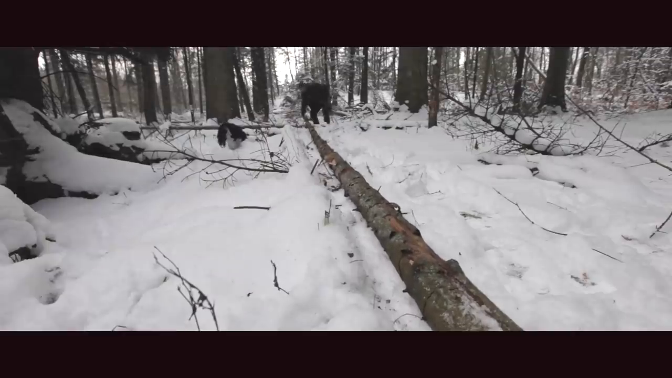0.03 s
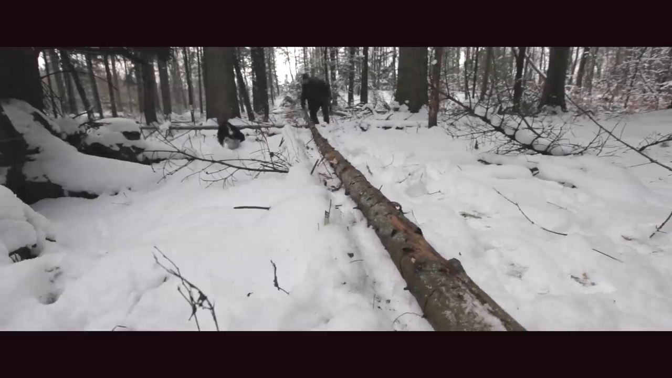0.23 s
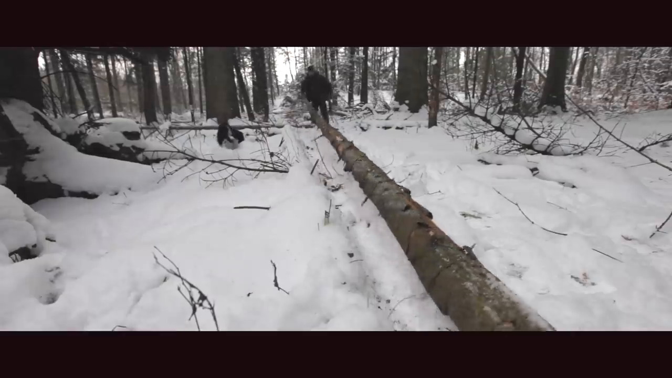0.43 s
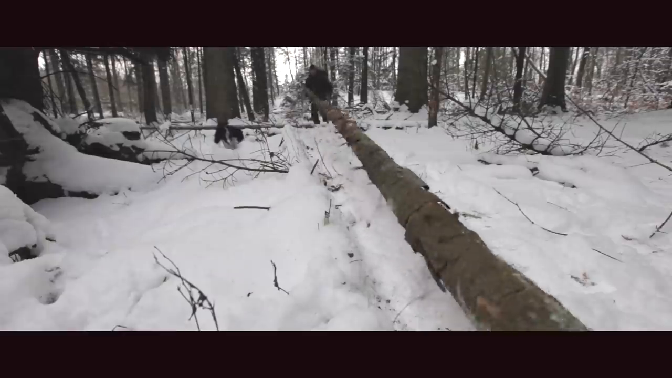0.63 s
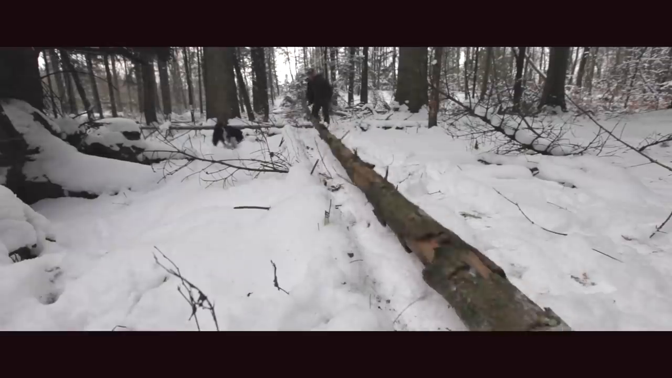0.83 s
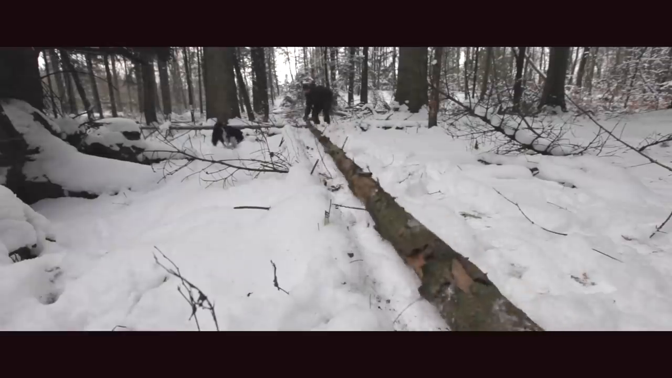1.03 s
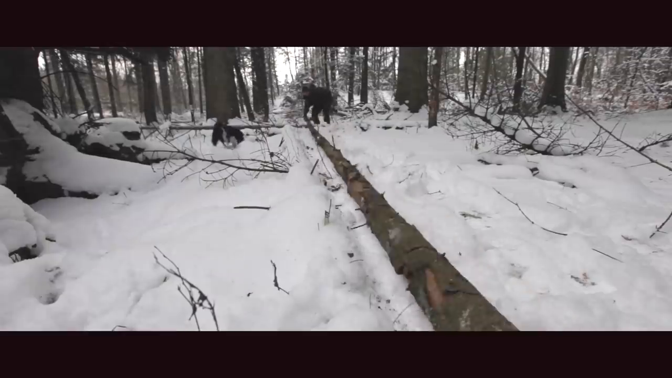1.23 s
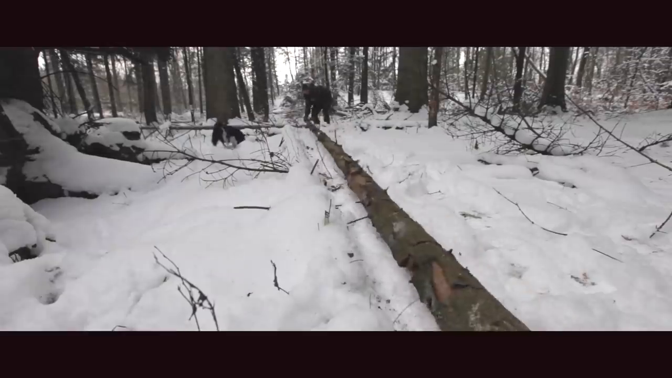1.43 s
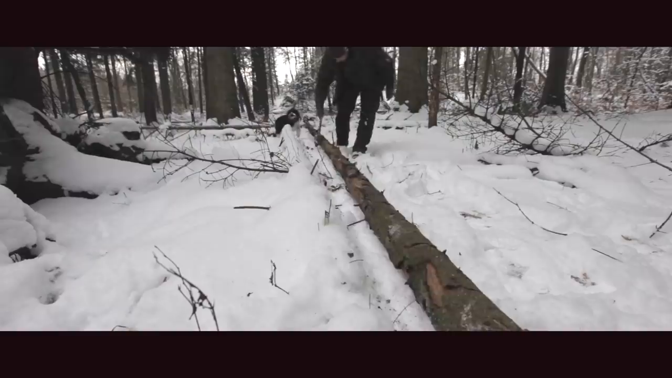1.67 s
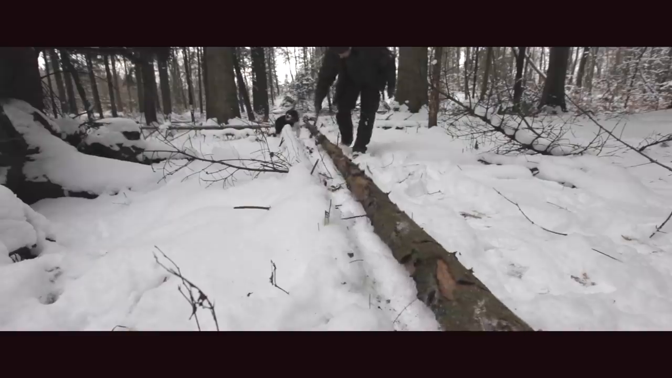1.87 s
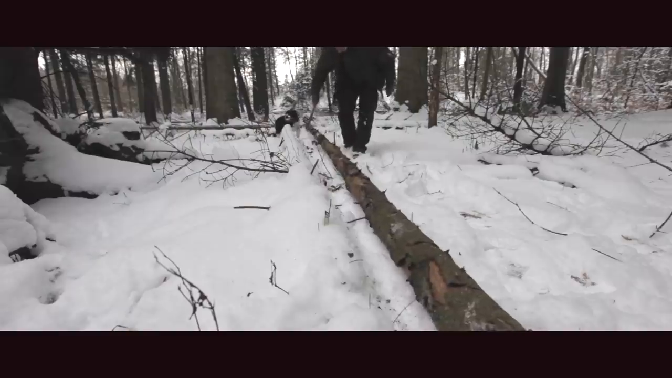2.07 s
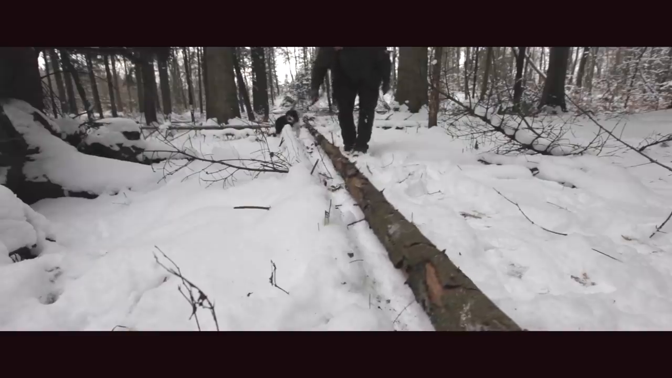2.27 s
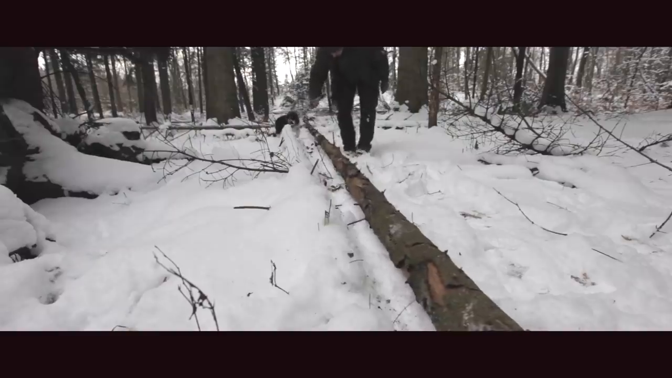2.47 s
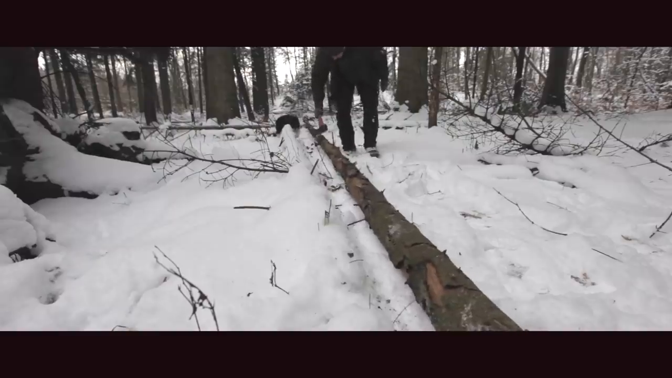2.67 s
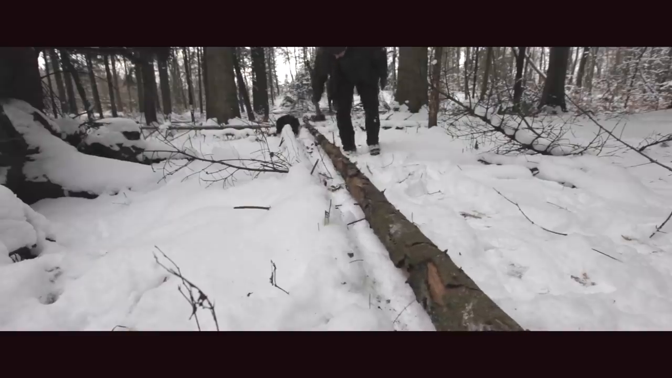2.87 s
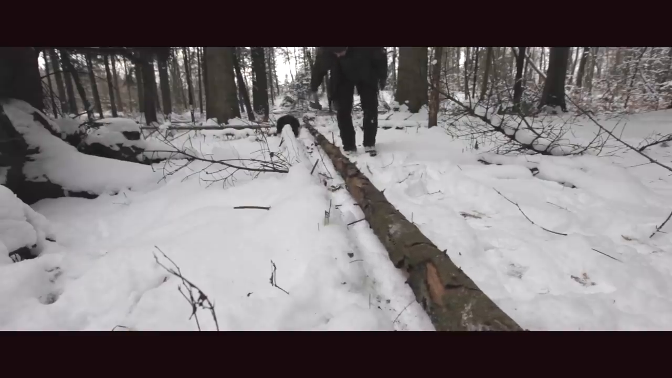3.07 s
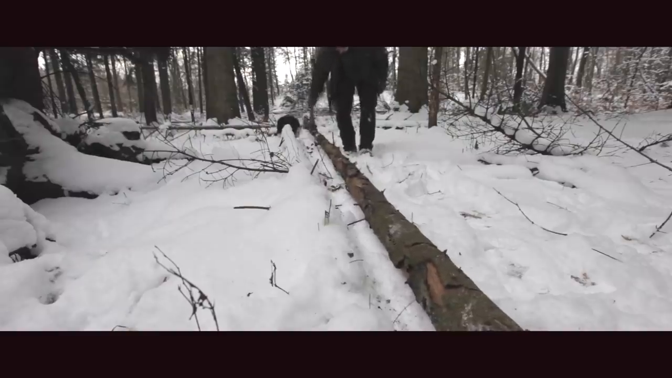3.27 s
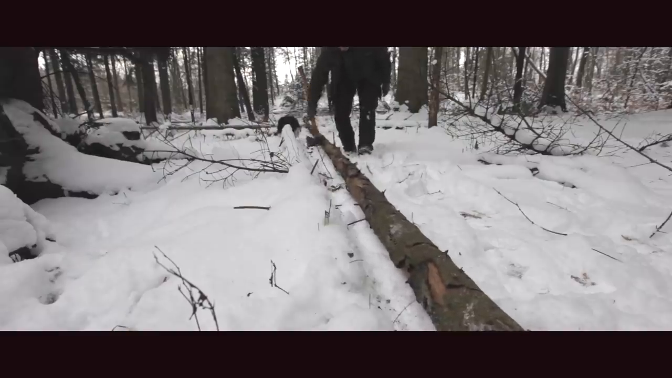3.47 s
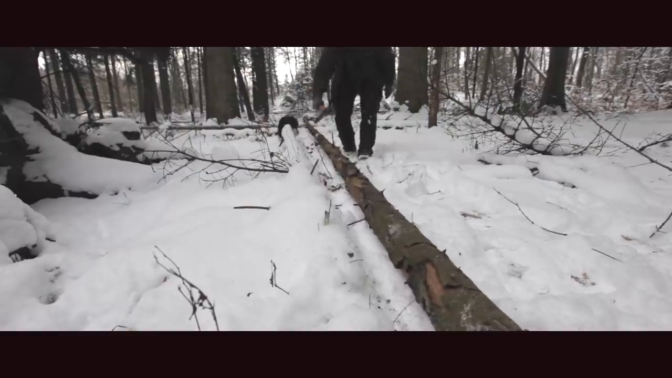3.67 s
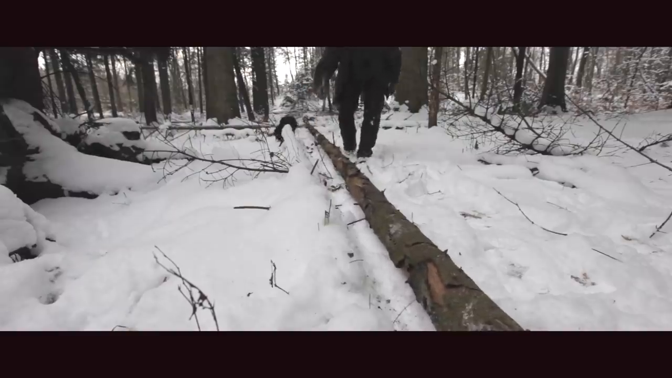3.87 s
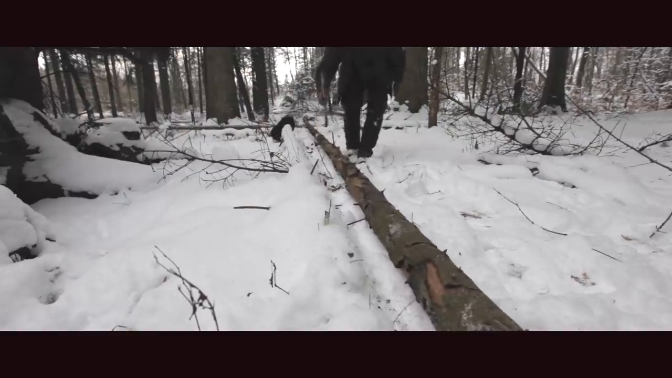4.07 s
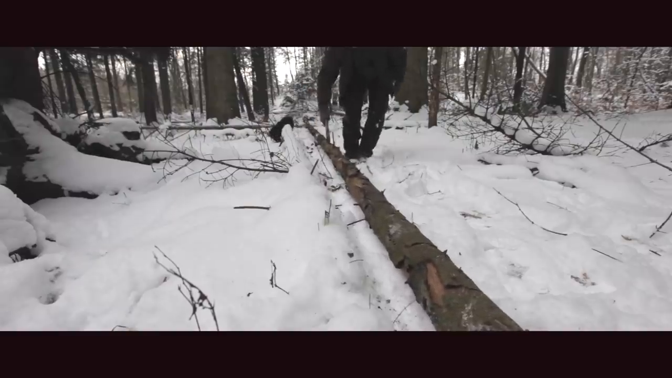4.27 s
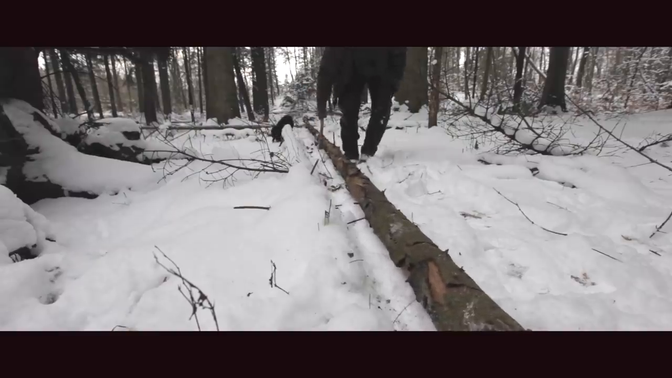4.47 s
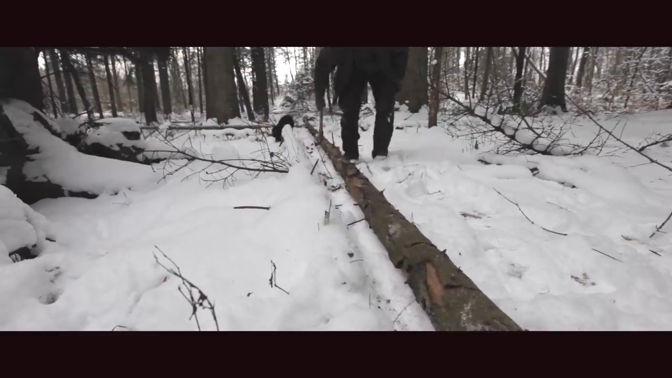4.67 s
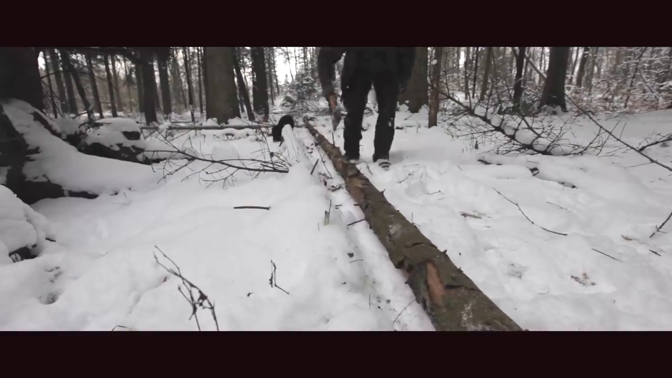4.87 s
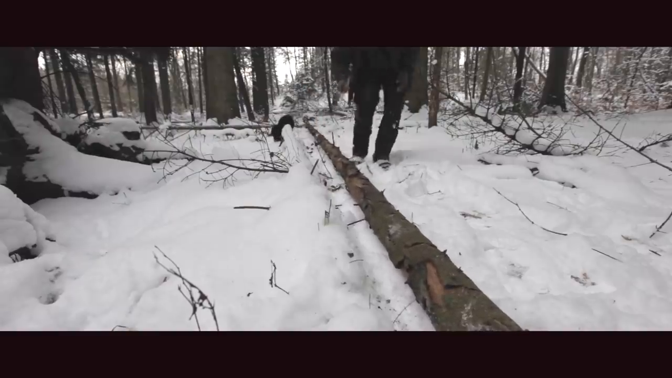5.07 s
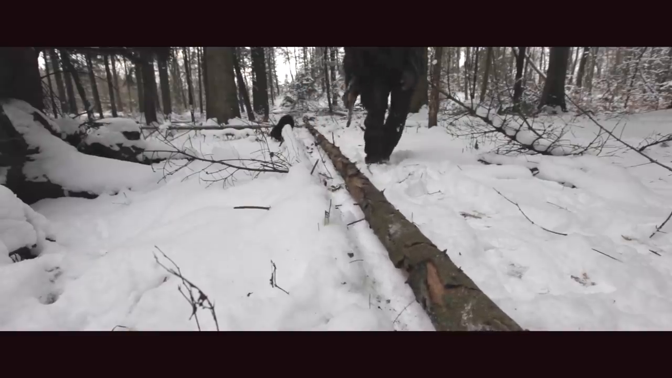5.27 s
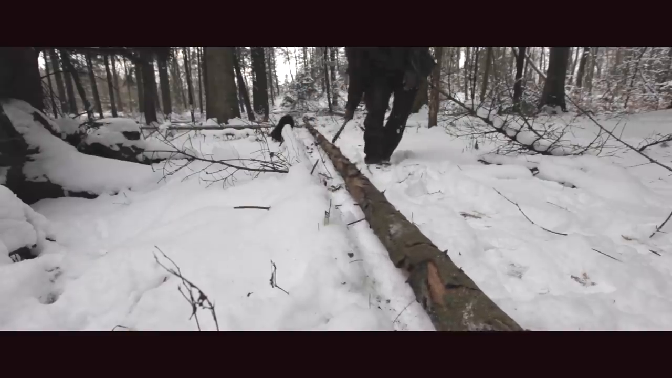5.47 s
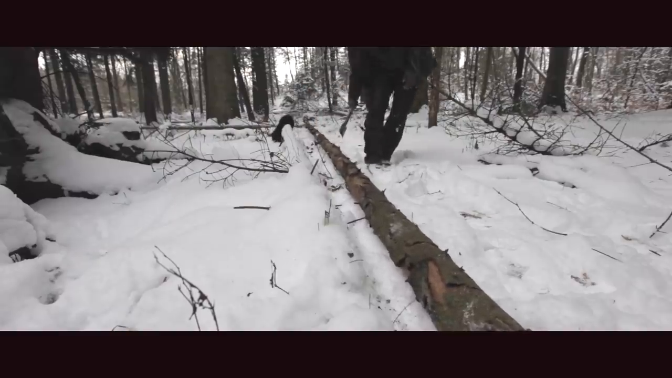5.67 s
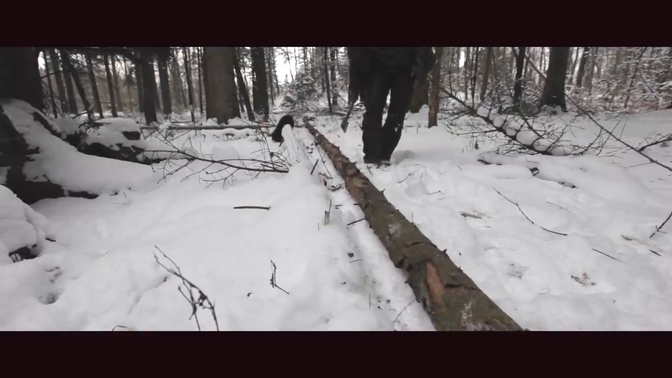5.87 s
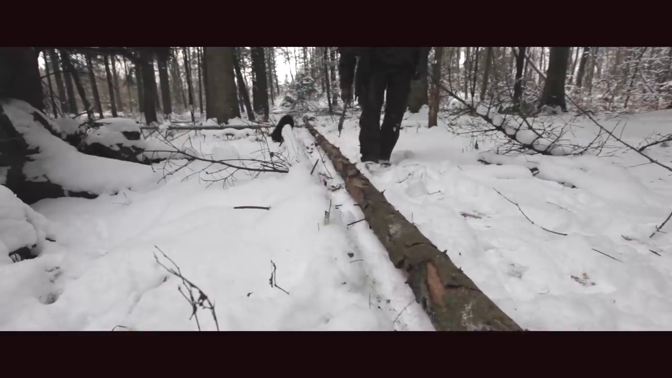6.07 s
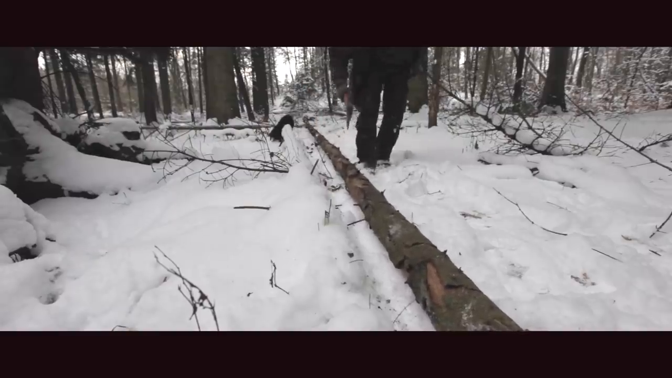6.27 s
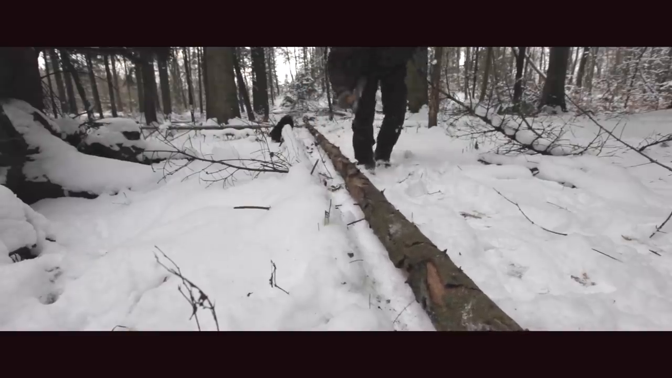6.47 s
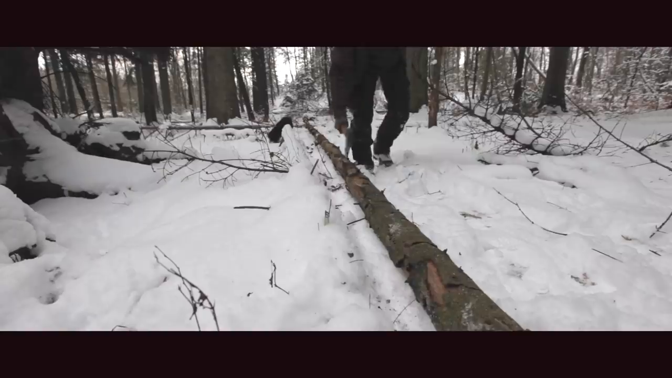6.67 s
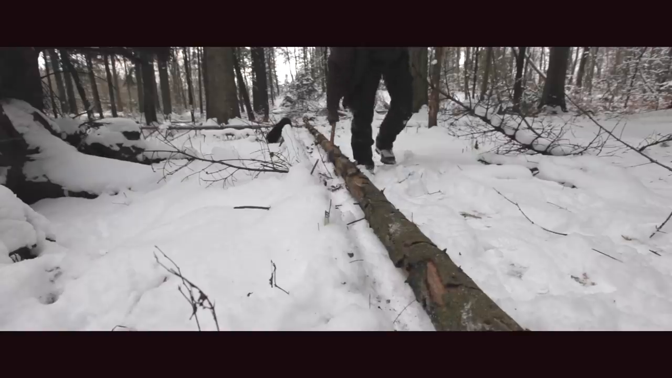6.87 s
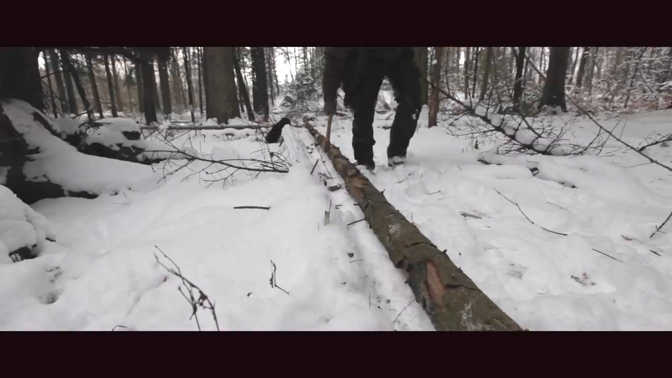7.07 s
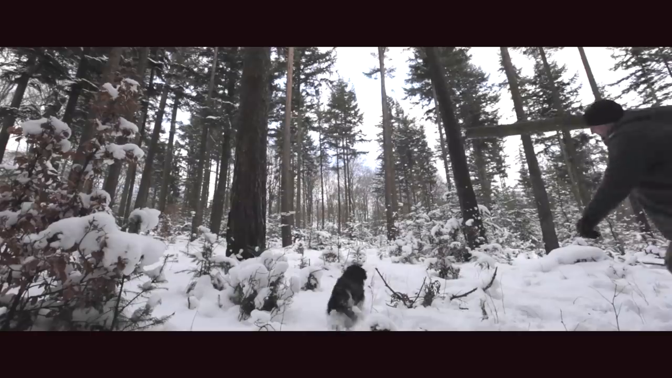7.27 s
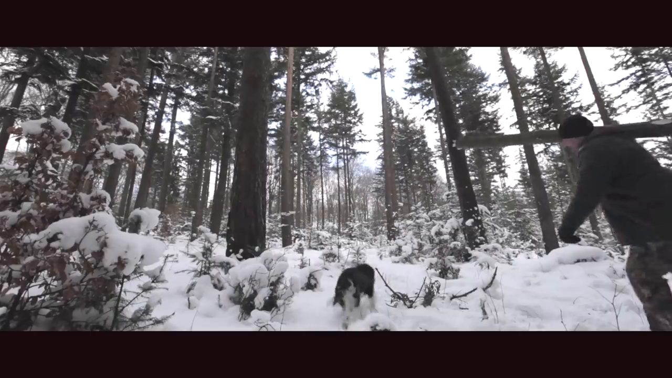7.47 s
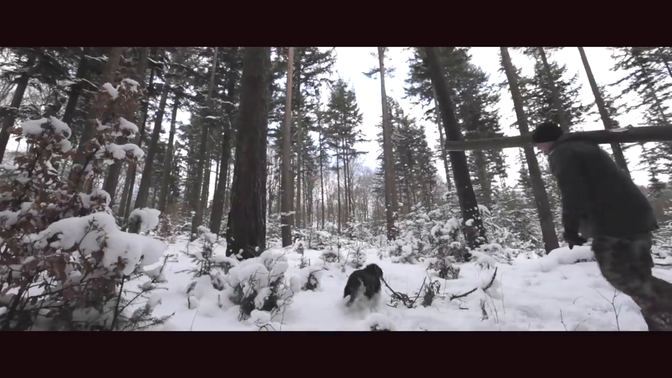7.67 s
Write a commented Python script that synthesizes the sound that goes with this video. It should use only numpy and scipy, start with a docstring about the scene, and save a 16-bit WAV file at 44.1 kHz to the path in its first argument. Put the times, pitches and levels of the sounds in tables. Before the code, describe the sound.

A quiet winter forest, heard close and almost dry, with soft air hush and a faint bright hiss. From 0 to 1.6 seconds a felled trunk is dragged in lurches: low rumble, crunching snow and bark, snapping twigs. Cracks gather near 0.85, then it lands at 1.0 with a huge, overloaded low wooden thud and bounces at 1.27. A glancing axe blow at 1.7 adds splintering and a tiny high steel ping. Further sharp chops fall at about 2.76, 3.45, 4.3 (a quick double), 5.47 and 6.73, each a short damped knock with brittle tearing fibres. The hush dips after each blow and swells back. Between them are cloth swishes, longest around 5.4, soft snow steps and small ticks of chips. At 7.2 the hush turns louder and steady, with a swish, then a thrown pole knocks twice quickly at 7.4.

```python
"""An axe lops dry branches off a felled trunk in a snowy forest, over a hush and a faint bright hiss.
First the trunk is dragged, rumbling and crunching amid snapping twigs, and dropped with one bounce.
Then each blow is a damped knock that rings the log's modes, with a quick volley of snapping fibres;
the hush, filtered noise, is turned down and swells back; noise swells make sleeves swish and snow crunch.
Near the end the hush turns louder and steady, and a thrown pole knocks. The loudest peaks overload."""
import sys
import numpy as np
from scipy import signal
from scipy.fft import rfft, irfft
from scipy.io import wavfile
from scipy.ndimage import uniform_filter1d

SR = 44100
rng = np.random.default_rng(int(sys.argv[2]) if len(sys.argv) > 2 else 0)


def log_audio(samples):
    """Write samples as a 16-bit WAV file to the path given in sys.argv[1]."""
    # one column per channel
    frames = np.atleast_2d(samples).T
    # limit to full scale, then quantise
    limited = np.clip(frames, -1, 1)
    pcm = np.round(limited * 32767).astype(np.int16)
    wavfile.write(sys.argv[1], SR, pcm)


N = 340011  # samples
T = np.arange(N) / SR  # seconds


def from_db(db):
    """Amplitude gain is ten to the power of a twentieth of the decibels."""
    return 10 ** (np.asarray(db) / 20)


def rms_one(x):
    """Normalise to a mean square of one, so that a later gain sets the RMS level."""
    return x / np.sqrt(np.mean(x ** 2) + 1e-20)


def add(track, s, sound):
    """Superposition: mix a sound into the track from time s in seconds."""
    at = max(round(s * SR), 0)
    track[at:at + len(sound)] += sound[:N - at]


def lowpass(x, hz):
    """Second-order Butterworth low-pass: flat below the cutoff, falling 12 dB per octave above."""
    return signal.sosfilt(signal.butter(2, hz, fs=SR, output="sos"), x)


def highpass(x, hz):
    """Second-order Butterworth high-pass: flat above the cutoff, falling 12 dB per octave below."""
    return signal.sosfilt(signal.butter(2, hz, "high", fs=SR, output="sos"), x)


def coloured(x, spectrum, size=4096):
    """Minimum-phase filtering with the given spectrum; unit energy keeps the power of white noise."""
    hz, db = np.transpose(spectrum)
    grid = np.maximum(np.arange(size // 2 + 1) * SR / size, 1)
    log_gain = np.log(from_db(np.interp(np.log(grid), np.log(hz), db)))
    # folding the cepstrum onto positive times makes the filter causal
    cepstrum = irfft(log_gain)
    cepstrum[1:size // 2] *= 2
    response = irfft(np.exp(rfft(cepstrum[:size // 2], size)))
    return signal.oaconvolve(x, response / np.linalg.norm(response))[:len(x)]


def ring(x, hz, t60):
    """A damped resonator: a unit click sets a sine ringing that falls 60 dB in t60."""
    radius = from_db(-60 / (t60 * SR))
    angle = 2 * np.pi * hz / SR
    feedback = [1, -2 * radius * np.cos(angle), radius * radius]
    return signal.lfilter([0, np.sin(angle)], feedback, x + 1e-18)


def fade(t, t60):
    """Exponential decay by sixty decibels in t60."""
    return np.exp(-np.log(1000) * t / t60)


def swells(rows):
    """Gaussian gain envelopes, each given by its time, peak in dB and half length to 1/e in seconds."""
    return sum(from_db(db) * np.exp(-np.minimum(((T - s) / length) ** 2, 60)) for s, db, length in rows)


def grains(size, spread_db):
    """Impulsive noise: dense clicks of random sign and very uneven strength, with unit power."""
    strength_db = spread_db * np.minimum(rng.exponential(1, size), 7)
    return rms_one(rng.choice([-1, 1], size) * from_db(strength_db))


def scattered(x, t60, cut_hz):
    """Diffuse scattering: a dull noise tail that builds up over a few milliseconds, then decays."""
    t = T[:SR]
    tail = rng.standard_normal(SR) * fade(t, t60) * (1 - np.exp(-t / 0.012))
    tail = lowpass(tail / np.linalg.norm(tail), cut_hz)
    return signal.oaconvolve(x, tail)[:N]


# Dips of the hush after heavy blows. Each row: start in seconds, depth in dB,
# time constant of recovery in seconds.
HUSH_DIPS = [(1.03, 11, 0.96), (1.73, 17.5, 1.7), (2.78, 21.5, 1.1), (3.47, 15.5, 1.76), (4.34, 20, 1.07),
             (5.487, 28.5, 0.78), (6.74, 18.5, 0.98)]
# Spectrum of the hush. Each row: frequency in Hz, relative density in dB per Hz.
HUSH_SPECTRUM = [(18, -37.5), (30, -13.5), (79, -6.5), (239, -9), (273, -5.5), (311, -4.5), (404, -5),
                 (486, -3.5), (702, -3), (962, -3), (1220, -3), (2680, -10), (6900, -19), (9220, -33),
                 (16000, -45)]
HUSH_DB, DIP_ONSET_S = -38, .045
LOUDER_FROM_S, LOUDER_HUSH_DB = 7.191, -34.5  # from here on the hush is louder and steady


def hush():
    """Gain-ducked noise: turned down after heavy blows, as by automatic gain, it swells back."""
    dip_db = np.zeros(N)
    for s, depth_db, recovery in HUSH_DIPS:
        after = T >= s
        dip_db[after] = depth_db * np.exp(-(T[after] - s) / recovery)
    dipping_db = HUSH_DB - uniform_filter1d(dip_db, int(DIP_ONSET_S * SR))
    level_db = np.where(T < LOUDER_FROM_S, dipping_db, LOUDER_HUSH_DB)
    return from_db(level_db) * coloured(rng.standard_normal(N), HUSH_SPECTRUM)


# Spectrum of the bright crack. Each row: frequency in Hz, relative density in dB per Hz.
CRACK_SPECTRUM = [(1180, -44.5), (2000, -31), (3140, -16.5), (3710, -9), (4490, -8), (4990, -6),
                  (5780, -2.5), (6640, 1.5), (8120, -8), (9660, -15), (10400, -18.5), (14900, -35),
                  (16000, -33.5)]
# Spectrum of the woody midrange. Each row: frequency in Hz, relative density in dB per Hz.
WOODY_SPECTRUM = [(60, -49.5), (200, -0.5), (400, 0), (850, -1.5), (1400, -6), (1950, -3.5), (2700, -7),
                  (4500, -10.5), (12000, -56)]


def breaking(crack, woody):
    """Source and filter: abrupt fractures are heard through a bright and a woody spectrum."""
    return coloured(crack, CRACK_SPECTRUM) + coloured(woody, WOODY_SPECTRUM)


# Lurches of the log over the snow. Each row: peak time in seconds, half length in seconds,
# rumble in dB before a 4.5 dB cut, crunch in dB before a 6 dB cut.
LOG_LURCHES = [(0.236, 0.044, -33.5, -39), (0.55, 0.04, -37, -45.5), (0.654, 0.055, -63, -40.5),
               (.838, 0.025, -25.5, -25), (0.921, 0.041, -46, -33), (1.044, 0.062, -24, -34),
               (1.247, 0.037, -49, -30), (1.311, 0.07, -31, -35.5), (1.47, 0.065, -39, -59)]
# Spectrum of the rumble. Each row: frequency in Hz, relative density in dB per Hz.
RUMBLE_SPECTRUM = [(25, -15.5), (70, 10.5), (110, 5), (170, 1), (350, -4), (800, -35), (1500, -24),
                   (5000, -37)]
# steady sliding between the lurches, before the same two cuts
SLIDE_END_S, SLIDE_RUMBLE_DB, SLIDE_CRUNCH_DB = 1.6, -48, -45.5


def dragging():
    """Sliding friction: the log rumbles in lurches and crushes snow and bark in clumps of crumbs."""
    sliding = T < SLIDE_END_S
    rumble_rows = [(s, db, length) for s, length, db, _ in LOG_LURCHES]
    crunch_rows = [(s, db, length) for s, length, _, db in LOG_LURCHES]
    rumble_gain = from_db(SLIDE_RUMBLE_DB) * sliding + swells(rumble_rows)
    crunch_gain = from_db(SLIDE_CRUNCH_DB) * sliding + swells(crunch_rows)
    rumble = from_db(-4.5) * rumble_gain * coloured(rng.standard_normal(N), RUMBLE_SPECTRUM)
    # about 1000 clumps a second, each a short decaying push
    clumps = np.abs(grains(N, spread_db=2.3)) * (rng.random(N) < 1000 / SR)
    pressure = signal.oaconvolve(clumps, fade(T[:SR // 20], .016))[:N]
    crumbs = rms_one(pressure * grains(N, spread_db=3.0))
    splinters = rms_one(pressure * grains(N, spread_db=4.0))
    crush = breaking(crumbs, from_db(1.5) * splinters)
    return rumble + from_db(-6) * crunch_gain * crush


# Swishes of cloth and snow. Each row: peak time in seconds, peak in dB before a 3 dB cut,
# half length in seconds.
RUB_SWISHES = [(1.8, -45, 0.059), (2.18, -56.5, 0.086), (2.45, -50, 0.079), (2.87, -54, 0.058),
               (3.55, -52.5, 0.067), (3.95, -61, 0.13), (4.175, -35.5, 0.045), (4.98, -44.5, 0.084),
               (5.19, -37.5, 0.026), (5.40, -37, 0.12), (6.42, -51.5, 0.29), (7.24, -28, 0.033)]
# Spectrum of the rubbing. Each row: frequency in Hz, relative density in dB per Hz.
RUB_SPECTRUM = [(1650, -31), (2800, -17), (4180, -11), (4770, -8.5), (6070, -4.5), (6820, -4),
                (7770, -13.5), (10000, -21), (11800, -30), (14300, -25.5), (16000, -45.5)]
STEADY_HISS_DB = -62  # a faint, steady, bright hiss under the swishes; before the same 3 dB cut
SLEEVE_PEAK_S, SLEEVE_DB, SLEEVE_RISE_S, SLEEVE_FALL_S = 5.45, -37.5, 0.16, .035


def rubbing():
    """Friction noise: swishes of fine grains over a steady hiss; a sleeve whistles at a resonance."""
    hiss_gain = from_db(STEADY_HISS_DB) + swells(RUB_SWISHES)
    hiss = from_db(-3.0) * hiss_gain * coloured(grains(N, spread_db=4.0), RUB_SPECTRUM)
    half_length = np.where(T < SLEEVE_PEAK_S, SLEEVE_RISE_S, SLEEVE_FALL_S)
    slide_gain = swells([(SLEEVE_PEAK_S, SLEEVE_DB, half_length)])
    whistle = slide_gain * rms_one(ring(rng.standard_normal(N), hz=4900, t60=0.0092))
    return hiss + highpass(whistle, 3000)


def volleys(rows):
    """Fracture as a cascade: fibres part in snaps that swell and die, each with crack and woody body."""
    cracks, woody = np.zeros(N), np.zeros(N)
    for s, db, length, wood_db in rows:
        age = T[:SR // 8] / length
        envelope = 2 * np.exp(-age) * (1 - np.exp(-age / 0.51))
        for track, level_db in ((cracks, db), (woody, db + wood_db - 6)):
            volley = grains(len(envelope), spread_db=4.0) * envelope
            # every volley keeps the energy of its envelope
            volley *= np.linalg.norm(envelope) / np.linalg.norm(volley)
            add(track, s, from_db(level_db) * volley)
    return breaking(cracks, woody)


# Snapping twigs. Each row: start in seconds, level in dB,
# woody midrange in dB relative to the crack, before a 6 dB cut.
TWIG_SNAPS = [(.094, -41.5, 26), (.122, -27, -4), (.227, -29, 15.5), (.243, -26.5, -5), (.752, -30, 7),
              (.8455, -16.5, 5.5), (.869, -25.5, 11.5), (.915, -19, -4), (.926, -11, 2.5),
              (1.2465, -19, 13.5), (1.2605, -23, 4), (1.89, -41, 10), (1.952, -48.5, 20.5),
              (2.385, -29, -15), (3.292, -42, -15), (4.300, -31, 4), (4.376, -33, -22), (5.804, -40, -28),
              (6.426, -35, -14), (6.560, -26, -8), (6.600, -34.5, -16), (6.847, -38.5, -15)]
# Bark and dry wood crushed. Each row: start in seconds, level in dB, fade time constant in seconds,
# woody midrange in dB relative to the crack, before a 6 dB cut.
BARK_CRACKLES = [(.993, -32.5, .0041, 20.5), (1.003, -13, 0.0052, 8.5), (1.017, -26.5, .0089, -3),
                 (1.283, -31, 0.0064, 12.5), (1.660, -28, 0.0055, 4.5), (1.731, -27, 0.021, -1),
                 (1.778, -26.5, 0.012, -8), (2.797, -22.5, .0055, -14), (7.384, -43, 0.0095, 24.5)]
TWIG_FADE_S = .0012
CHIPS_PER_S, CHIP_DB, CHIP_SPREAD_DB, CHIP_WOOD_DB = 1.5, -41.5, 2, -24  # faint ticks of falling chips


def twigs():
    """Brittle fracture: twigs snap in very short volleys, bark in longer ones; chips tick at random."""
    draws = rng.random((40, 2))
    # exponential gaps give a Poisson process
    times = np.cumsum(-np.log(1 - draws[:, 0])) / CHIPS_PER_S
    levels_db = CHIP_DB + CHIP_SPREAD_DB * (2 * draws[:, 1] - 1)
    chips = [(s, db, CHIP_WOOD_DB) for s, db in zip(times, levels_db) if s < T[-1]]
    short = [(s, db, TWIG_FADE_S, wood_db) for s, db, wood_db in list(TWIG_SNAPS) + chips]
    return volleys(short + list(BARK_CRACKLES))


def swing(hz, cycles):
    """Radiation by acceleration: the air follows the change of a brief, damped swing. Peak 1."""
    t = T[:SR // 8]
    age = t * hz / cycles
    motion = age ** 2 * np.exp(-np.minimum(2 * age, 80)) * np.sin(2 * np.pi * hz * t)
    pressure = np.gradient(motion)
    return pressure / np.abs(pressure).max()


# Knocks on wood. Each row: start in seconds, push in dB, pitch of the push in Hz, contact in dB,
# ring of the log in dB, added to the mode levels.
WOOD_KNOCKS = [(.227, -28, 188, -26, -25), (0.8686, -39, 385, -17, -9), (0.9928, -22, 280, -3.5, -22),
               (.995, 10, 298, -10, 14), (1.001, 0, 170, -24, -3), (1.2735, -3.5, 259, -12.5, 10.5),
               (1.659, -26, 326, -25, -10.5), (1.718, -9.5, 268, -7.5, 0.5),
               (2.7601, -34, 368, -10.5, -13.5), (3.443, -20, 261, -37, -16.5),
               (3.4548, -19, 237.5, -22.5, 3), (4.3090, -9, 290, -18, -3), (4.3267, -9.5, 283, 1.5, 5),
               (5.4739, -10.5, 400, -7.5, -11), (6.7243, -10.5, 336, -12, -1.5),
               (7.269, -37.5, 276.5, -22.5, -30), (7.3842, -7, 560, -13.5, -11.5),
               (7.402, -15, 503, -19, -16)]
# Modes of the log. Each row: frequency in Hz, relative level in dB, decay by 60 dB in seconds.
LOG_MODES = [(130, -43.5, 0.63), (165, -29.5, 0.15), (189, -29.5, 0.17), (224, -32.5, 0.26),
             (256.7, -28.5, 0.26), (309, -26.5, 0.16), (357, -27, 0.12), (392, -30.5, 0.25),
             (445, -24, 0.1), (500, -29, 0.15), (560.6, -26.5, 0.16), (742, -32, 0.11), (796, -29.5, .1)]
# cycles until each swing is widest; the hard contact is higher than the push that follows it
KNOCK_CYCLES, CONTACT_CYCLES, CONTACT_RATIO, PUSH_LAG_S = 0.53, 0.77, 2.39, .0012
LOG_REACH = 1.15  # highest mode that a blow excites well, as a multiple of its pitch


def knocks():
    """Modal excitation: a hard contact, then a lower push that travels on into the log's modes."""
    spot, log, t = np.zeros(N), np.zeros(N), T[:SR]
    mode_hz, mode_db, mode_t60 = np.transpose(LOG_MODES)
    shapes = np.sin(2 * np.pi * mode_hz[:, None] * t) * fade(t, mode_t60[:, None])
    shapes = shapes * (1 - np.exp(-t / 0.0038))
    signs = (-1) ** np.arange(len(mode_hz))
    for s, push_db, hz, contact_db, ring_db in WOOD_KNOCKS:
        add(spot, s, from_db(contact_db) * swing(CONTACT_RATIO * hz, CONTACT_CYCLES))
        add(spot, s + PUSH_LAG_S, from_db(push_db) * swing(hz, KNOCK_CYCLES))
        # the contact's share of the blow
        hardness = 1 / (1 + from_db(push_db - contact_db) ** 2)
        # a slow push cannot reach the high modes
        reach_hz = LOG_REACH * hz * CONTACT_RATIO ** hardness
        softness = 1 / (1 + (mode_hz / reach_hz) ** 4)
        # each spot feeds the modes differently
        place_db = rng.normal(0, 1.5, len(mode_hz))
        strengths = from_db(ring_db + mode_db + place_db) * signs
        add(log, s + PUSH_LAG_S, (strengths * softness) @ shapes)
    return spot + log + from_db(-8.5) * scattered(spot, t60=0.071, cut_hz=440)


# Glancing blows that make the thin blade sing. Each row: start in seconds, level in dB.
BLADE_PINGS = [(1.660, -61), (1.72, -51)]


def blade():
    """Beating: two close, high steel modes interfere as they fade."""
    taps = np.zeros(N)
    for s, db in BLADE_PINGS:
        add(taps, s, [from_db(db)])
    return ring(taps, hz=10039, t60=.48) + .5 * ring(taps, hz=9969, t60=.45)


# Cuts into a branch. Each row: start in seconds, bite in dB, bite fade time constant in seconds,
# woody midrange in dB relative to the bite, before a 6 dB cut, time until the tear in seconds,
# tear in dB, peak of the last click in dB.
BRANCH_CUTS = [(1.716, -19.5, 0.0037, 14, 0.0054, -8, 2.5), (2.7587, -11.5, 0.0051, -8, .0052, -4, -4.5),
               (3.4544, -27.5, .008, 5.5, 0.0073, -11.5, -5.5), (4.3126, -22, 0.0049, 4, .008, -19, -18.5),
               (4.3283, -11, 0.0049, 6, .004, -14, -11.5), (5.474, -7.5, 0.0019, 9.5, 0.0036, -7.5, 5.5),
               (6.727, -6.5, 0.0032, -0.5, 0.0076, -11.5, -32)]
# Modes of the axe head. Each row: frequency in Hz, level in dB, decay by 60 dB in seconds.
AXE_MODES = [(2800, -46.5, 0.075), (3570, -47, 0.05), (6000, -49.5, 0.06), (7200, -49, .04)]
TEAR_FADE_S, TEAR_WOOD_DB, CLICK_LAG_S = 0.0031, -16.5, 0.0021
# a few fibres go on parting, at TRAIL_DB relative to the tear
TRAIL_LAG_S, TRAIL_DB, TRAIL_FADE_S, TRAIL_WOOD_DB = 0.012, -20, 0.0075, -3.5


def splits():
    """Staged fracture: bite, tear, last click and a trail of snaps, which faintly ring the axe head."""
    clicks, t, rows = np.zeros(N), T[:SR // 100], []
    for s, bite_db, bite_fade, wood_db, delay, tear_db, click_db in BRANCH_CUTS:
        rows.append((s, bite_db, bite_fade, wood_db))
        rows.append((s + delay, tear_db, TEAR_FADE_S, TEAR_WOOD_DB))
        rows.append((s + TRAIL_LAG_S, tear_db + TRAIL_DB, TRAIL_FADE_S, TRAIL_WOOD_DB))
        click = np.diff(rng.standard_normal(len(t)) * fade(t, 0.0036), prepend=0)
        click = lowpass(click, 6500)
        add(clicks, s + delay + CLICK_LAG_S, from_db(click_db) * click / np.abs(click).max())
    cracks = volleys(rows)
    axe_head = sum(from_db(db) * ring(cracks, hz, t60) for hz, db, t60 in AXE_MODES)
    return cracks + clicks + axe_head


# Boots pressing into snow. Each row: peak time in seconds, level in dB, half length in seconds.
SNOW_STEPS = [(2.548, -49.5, 0.015), (2.602, -53.5, 0.052), (3.455, -39, 0.015), (3.887, -55, 0.048),
              (4.235, -49, 0.021), (4.365, -38, .015), (6.504, -49, 0.015), (6.735, -39, 0.015)]


def steps():
    """Band-limited noise: packed snow gives way with a soft, low push."""
    band = signal.butter(2, [55, 190], "band", fs=SR, output="sos")
    push = signal.sosfilt(band, rng.standard_normal(N))
    return swells(SNOW_STEPS) * rms_one(push)


def scene():
    """Superposition of all sources; the trees scatter a little of the blows back."""
    timber = highpass(knocks(), 55)  # keeps the knocks free of deep bass
    blows = timber + splits() + blade() + twigs()
    trees = from_db(-28.5) * scattered(blows, t60=0.31, cut_hz=8200)
    return (blows + trees + dragging() + rubbing() + steps() + hush())[None]


def record(dry):
    """Saturation and band limiting: peaks flatten at full scale, the top rolls off and is cut."""
    clipped = dry / (1 + dry ** 8) ** (1 / 8)
    softened = lowpass(clipped, 14000)
    return signal.sosfilt(signal.cheby1(12, .2, 15900, fs=SR, output="sos"), softened)


dry = scene()
out = record(dry)
log_audio(out)
```